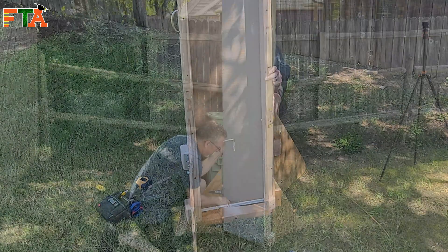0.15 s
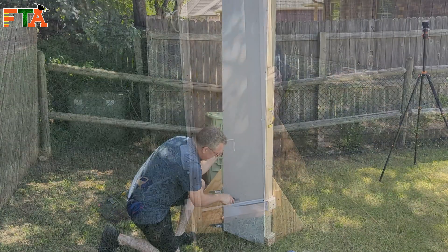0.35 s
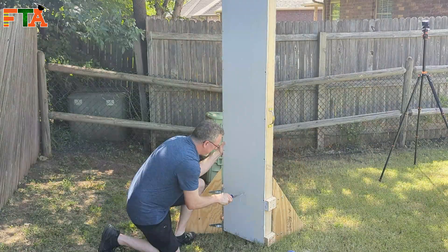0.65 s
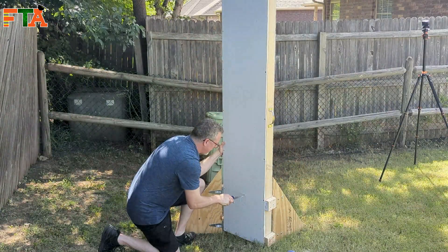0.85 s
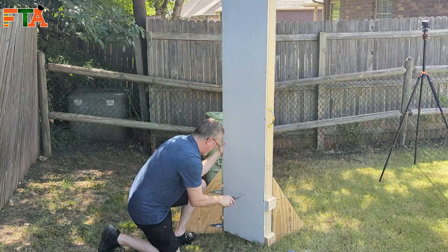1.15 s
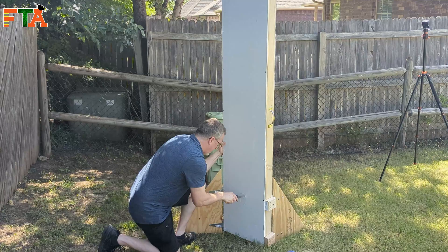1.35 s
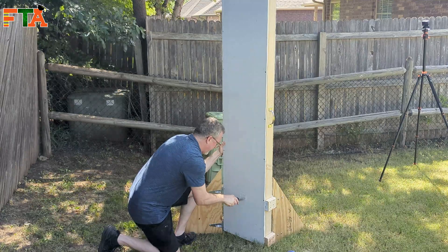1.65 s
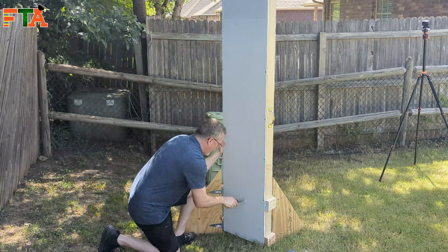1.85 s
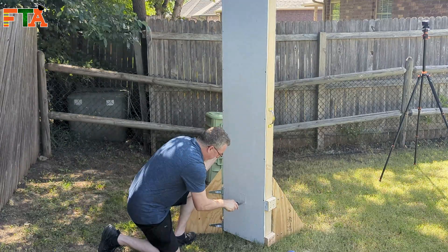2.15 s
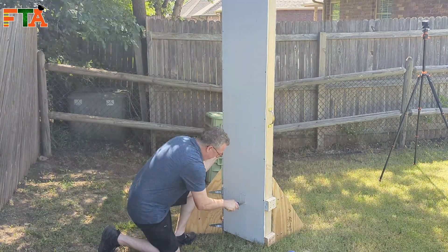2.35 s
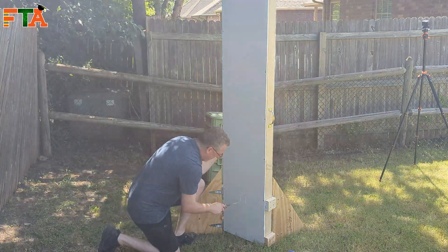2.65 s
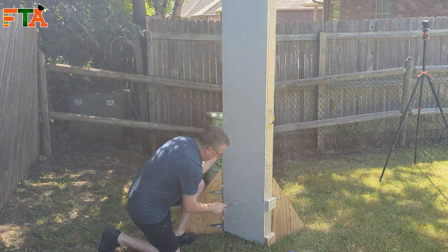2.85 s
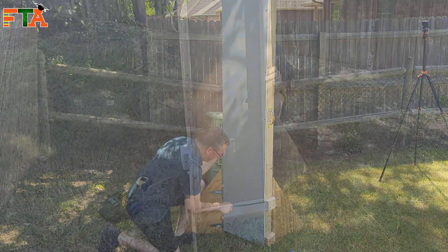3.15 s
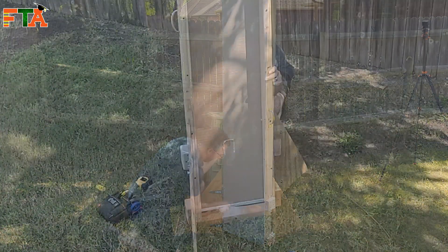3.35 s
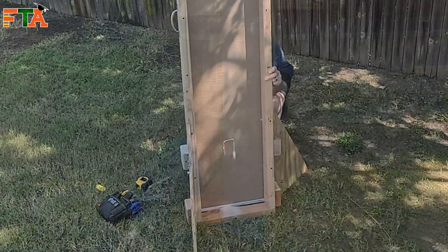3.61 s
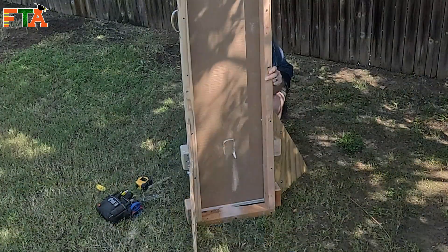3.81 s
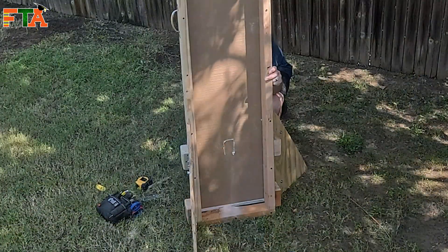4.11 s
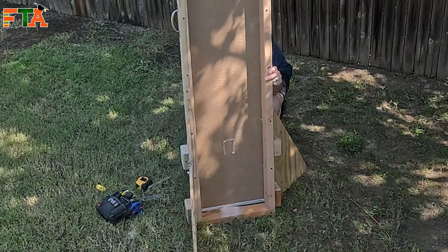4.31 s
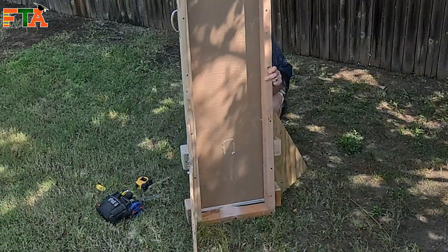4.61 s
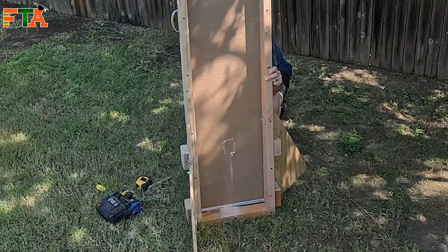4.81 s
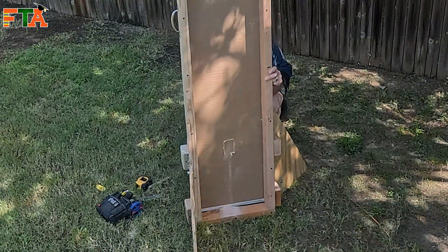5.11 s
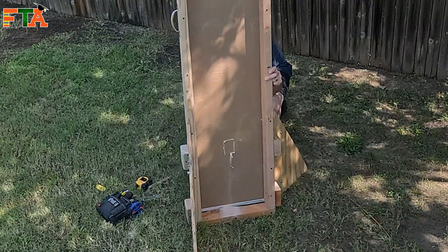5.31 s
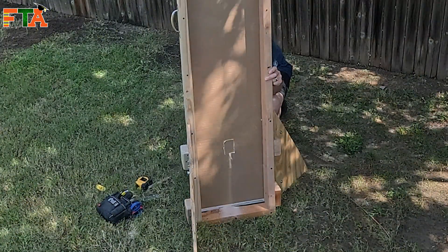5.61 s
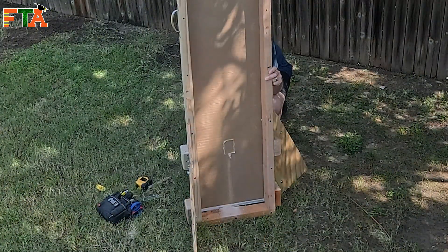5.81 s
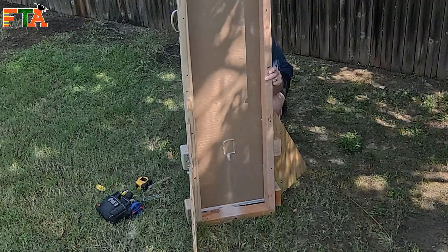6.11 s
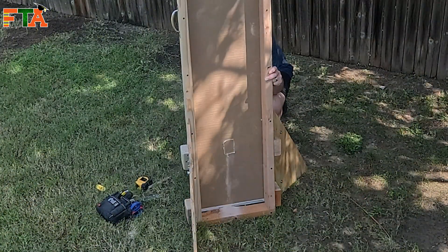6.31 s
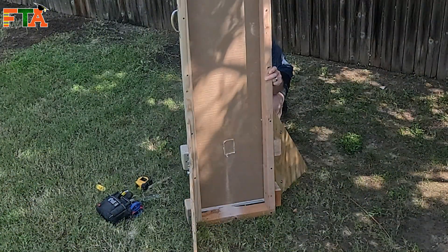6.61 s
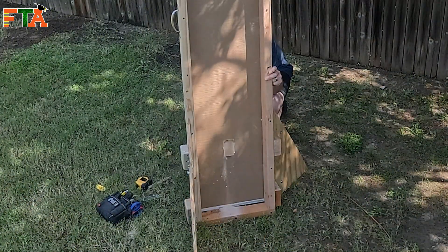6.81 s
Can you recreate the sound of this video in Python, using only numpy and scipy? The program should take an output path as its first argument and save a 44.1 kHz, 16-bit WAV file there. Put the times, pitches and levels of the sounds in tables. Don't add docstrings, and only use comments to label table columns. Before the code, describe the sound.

Quiet yard air and faint leaves open the scene. Light touches at 0.25 s lead to a burst of quick, bright, sped-up saw jabs from 0.37 to 0.68 s. A near-silent pause carries a very faint hum until 1.2 s. Then accelerated sawing bursts in unevenly, settling from 1.43 to 2.2 s into a rapid even chatter, about 28 strokes a second, with a hard knock near 2 s, and breaking up by 2.57 s. Quiet follows, with a tiny tap at 2.78 s and paper ticks from 3.05 to 3.3 s. From 3.62 s the sawing is at natural speed, deeper and hollow: a strong first stroke, weaker rubs, then steady strokes three or four a second, with panel thuds, gritty hiss, dragging and irregular cracks. Piercing five-kilohertz squeaks come at 5.25 and 5.32 s, a fainter one at 5.62 s. Sawing continues to the end near 7 s.

```python
import sys
import numpy as np
from scipy import signal
from scipy.fft import rfft, irfft, next_fast_len
from scipy.io import wavfile
from scipy.ndimage import uniform_filter1d, map_coordinates

SR = 44100
rng = np.random.default_rng(int(sys.argv[2]) if len(sys.argv) > 2 else 0)


def int16_out(signal):
    q = np.round(np.clip(np.atleast_2d(signal).T, -1, 1) * 32767)
    wavfile.write(sys.argv[1], SR, q.astype(np.int16))


def nominal_scale(level):
    x = np.asarray(level, float) / 20
    return 10 ** x


N = 306936
LAPSE = 4
STEADY_S = 0.038


def unit(x):
    return x / np.sqrt(np.mean(x ** 2) + 1e-20)


def along(points, hz):
    f, v = np.transpose(points)
    return np.interp(np.log(hz + 1), np.log(f + 1), v)


def curve(rows, column=1):
    rows = np.array(rows)
    t = np.arange(N) / SR
    return nominal_scale(np.interp(t, rows[:, 0], rows[:, column], left=-200, right=-200))


def wobble(rate):
    knots = rng.standard_normal(int(N * rate / SR) + 4)
    return map_coordinates(knots, [np.arange(N) * rate / SR])


def filtered(x, response):
    m = next_fast_len(N + SR // 2)
    return irfft(rfft(x, m) * response(np.fft.rfftfreq(m, 1 / SR)), m)[:N]


def noise(spectrum):
    return unit(filtered(rng.standard_normal(N), lambda hz: nominal_scale(along(spectrum, hz))))


def soften(x, hz):
    return signal.lfilter(*signal.butter(2, min(hz, 20000) / (SR / 2)), x)


def modes(table, speed=1):
    def response(f):
        total = 0
        for k, (hz, width, db) in enumerate(table):
            loss = 1j * f * width * speed
            total = total + (-1) ** k * nominal_scale(db) * loss / ((hz * speed) ** 2 - f * f + loss)
        return total
    return response


def driven(force, level, response):
    return filtered(force * level, response) / np.std(filtered(force, response))


def strokes(rows, values, crest, blunt, lead, trail, fade=1):
    out = np.zeros(N + SR)
    for (s, length, *_), v in zip(rows, values):
        u = np.linspace(0, 1, int(length * (1 + lead + trail) * SR))
        arch = np.sin(np.pi / 2 * np.where(u < crest, u / crest, (1 - u) / (1 - crest)))
        part = out[round((s - lead * length) * SR):][:len(u)]
        part[:] = np.maximum(part, v * arch ** np.where(u < crest, blunt, blunt * fade))
    return out[:N]


def teeth(rate, jitter, scatter_db):
    passed = np.floor(np.cumsum(rate * (1 + jitter * wobble(300))) / SR)
    hits = np.diff(passed, prepend=0) > 0
    sizes = nominal_scale(scatter_db * np.clip(rng.standard_normal(N), -2, 1.5))
    return unit(hits * sizes / np.sqrt(rate))


def cracks(events, t60):
    out, t = np.zeros(N + SR), np.arange(SR // 25) / SR
    fall = nominal_scale(-60 * t / t60)
    for s, db in events:
        burst = fall * rng.standard_normal(len(t))
        out[round(s * SR):][:len(t)] += nominal_scale(db) * burst * np.linalg.norm(fall) / np.linalg.norm(burst)
    return out[:N]


# start_s, level_db
YARD_AIR = [
    [(0, -57), (.225, -64.5)],
    [(.23, -68.5), (.7, -67.5), (.9, -69.5), (2.6, -67.5), (2.9, -67.5), (3.33, -69), (3.4, -70),
     (3.46, -80)],
    [(3.34, -67), (3.62, -63)],
]
# start_s, level_db
LEAF_RUSTLE = [
    [(0, -69), (.06, -64.5), (.13, -68.5), (.17, -65), (.225, -70)],
    [(3.34, -78), (3.37, -69), (3.4, -73.5), (3.7, -71), (4.2, -73.5), (5.1, -83), (5.22, -78), (5.3, -69),
     (6.96, -87)],
]
# pitch_hz, level_db (per Hz)
AIR_BACK_SPECTRUM = [(30, -18), (58, -4.5), (177, -1), (382, -14.5), (510, -10.5), (800, -17), (1300, -30),
                     (2600, -33), (5000, -74)]
LEAF_SPECTRUM = [(1180, -45), (2000, -17), (2690, -11), (3300, -11), (3800, -4), (6300, -5), (11600, -22.5),
                 (13500, -47)]
AIR_FRONT_SPECTRUM = [(60, -61), (115, -27), (155, -23), (330, -13), (404, -11), (570, -11), (1100, -21.5),
                      (1600, -28), (3000, -29.5), (5000, -39), (16000, -49)]
# start_s, end_s, pitch_hz, level_db
FAR_HUM = [(0.668, 1.2, 389.5, -74.5)]
# start_s, pitch_hz, level_db, t60_s
HANDLE_TAP = (2.778, 720, -49, .04)


def yard():
    t = np.arange(N) / SR
    back = (curve(YARD_AIR[0]) + curve(YARD_AIR[2])) * nominal_scale(4.3 * wobble(24.95)) * noise(AIR_BACK_SPECTRUM)
    leaves = (curve(LEAF_RUSTLE[0]) + curve(LEAF_RUSTLE[1])) * nominal_scale(1.6 * wobble(33)) * noise(LEAF_SPECTRUM)
    front = curve(YARD_AIR[1]) * nominal_scale(1.0 * wobble(23.0)) * noise(AIR_FRONT_SPECTRUM)
    hum = sum(nominal_scale(db + 3.0) * ((t > a) & (t < b)) * np.sin(2 * np.pi * hz * t) for a, b, hz, db in FAR_HUM)
    s, hz, db, t60 = HANDLE_TAP
    age = np.maximum(t - s, 0)
    tap = nominal_scale(db - 60 * age / t60) * np.tanh(age * hz) * np.sin(2 * np.pi * hz * age)
    mic_floor = nominal_scale(-100) * noise([(20, 5), (60, -1), (110, -32)])
    return mic_floor + back + leaves + front + hum + tap


def fences(x):
    t = np.arange(SR // 5) / SR
    tail = soften(rng.standard_normal(len(t)) * nominal_scale(-60 * t / 0.12) * (t > .005), hz=5000)
    return signal.fftconvolve(x, tail / np.linalg.norm(tail))[:N]


# pitch_hz, width_hz, level_db
PANEL_MODES = [(60.8, 8.5, -3), (83.5, 24.2, 1), (157.7, 21.5, 2.5), (214.2, 28.4, 1), (302.5, 15, -0.5),
               (394, 117, -8), (496.5, 28.4, 0), (556.5, 33.6, -3.5), (743, 96, -10), (918, 98, -12.5)]


def panel_body(speed=1, first=0):
    return modes(PANEL_MODES[first:], speed)


# pitch_hz, width_hz, level_db
FRAME_MODES = [(1308, 84, 0.5), (1702, 84, -2.5), (2202, 166, 0), (3130, 330, -3.5), (3720, 230, -5),
               (4300, 310, -2), (5050, 770, -12), (6650, 1000, -10), (8100, 560, -16)]


def frame_body(speed=1, count=None):
    return modes(FRAME_MODES[:count], speed)


# start_s, level_db
RESTLESS = [
    [(0.36, -76), (0.518, -55.5), (0.68, -64.5), (0.76, -87)],
    [(1.2, -62), (1.678, -59), (2.57, -61), (2.66, -104)],
]


def restless():
    return curve(RESTLESS[0]) + curve(RESTLESS[1])


# start_s, length_s, level_db (panel)
SEARCHING = [(0.367, 0.035, -46.5), (0.404, 0.035, -52.5), (0.464, 0.034, -42), (0.493, 0.028, -41),
             (0.522, 0.034, -44), (0.548, 0.038, -44), (0.576, 0.045, -42), (0.64, 0.033, -49.5),
             (1.21, 0.014, -55), (1.235, 0.031, -40.5), (1.237, 0.066, -34.5), (1.312, 0.061, -40),
             (1.36, 0.027, -45.5), (1.385, 0.066, -42), (2.172, 0.064, -45), (2.232, 0.047, -53.5),
             (2.281, 0.04, -45.5), (2.306, 0.04, -42.5), (2.371, 0.034, -50), (2.408, 0.049, -54),
             (2.446, 0.034, -46.5), (2.475, 0.029, -48), (2.52, 0.042, -51)]
# start_s, level_db (peak)
EVEN_CATCHES = [(1.437, -31.5), (1.4715, -35.5), (1.5038, -30.5), (1.5406, -34), (1.574, -31),
                (1.611, -29.5), (1.641, -28), (1.6804, -38), (1.711, -30.5), (1.7464, -38), (1.781, -31.5),
                (1.8162, -33.5), (1.8522, -30.5), (1.8874, -35.5), (1.9215, -33.5), (1.956, -44),
                (1.9952, -33), (2.027, -47), (2.0602, -30), (2.0996, -33.5), (2.1355, -33.5),
                (2.169, -35.5)]
EVEN_DB = [-34.5, -38, -39, -36.5, -37.5, -36.5, -33.5, -40.5, -34.5, -40, -35.5, -35.5, -36, -37.5, -38.5,
           -44.5, -40.5, -43, -37.5, -36, -37.5, -39]
# start_s, end_s, level_db (panel)
SET_DOWNS = [
    (0.224, 0.315, -65),
    (0.982, 1.172, -67),
    (3.038, 3.2, -70),
    (3.193, 3.341, -65),
]


def quick_strokes(count=6):
    push_lead_s = 0.015
    steady = [(s - push_lead_s, STEADY_S, db) for (s, _), db in zip(EVEN_CATCHES, EVEN_DB)]
    touches = []
    for a, b, db in SET_DOWNS:
        step = (b - a) / count
        for k, luck in enumerate(rng.standard_normal(count)):
            touches.append((a + step * k, 1.02 * step, db + 1.5 * luck))
    return np.array(SEARCHING + steady + touches)


def quick_catches(rows):
    loose = rows[~np.isclose(rows[:, 1], STEADY_S)]
    catch = strokes(loose, nominal_scale(1.056 * loose[:, 2] - 12), 0.44, blunt=3.2, lead=0.04, trail=0.059)
    even = [(s - 0.0072, 0.028) for s, _ in EVEN_CATCHES]
    rms = [nominal_scale(db - 17.5) for _, db in EVEN_CATCHES]
    catch += strokes(even, rms, 0.2, blunt=1.47, lead=0, trail=0.25)
    return catch + nominal_scale(-17) * restless()


# start_s, level_db
PAPER_SLIDES = [
    [(.98, -82), (1.0, -73.5), (1.19, -79)],
    [(3.0, -83), (3.06, -80), (3.18, -73), (3.21, -75), (3.33, -82)],
]
# pitch_hz, width_hz, level_db
PAPER_MODES = [(2000, 150, 10.5), (3600, 970, -5)]
# start_s, level_db (peak)
PAPER_TICKS = [(3.0494, -68), (3.0644, -62), (3.0769, -62), (3.0914, -65), (3.1074, -63), (3.1499, -61),
               (3.1774, -58), (3.2014, -66), (3.2146, -58), (3.2265, -58), (3.2516, -64), (3.2744, -57.5),
               (3.304, -55), (3.3172, -62)]


def quick_dust(catch, bites, studs):
    dust = catch * nominal_scale(-2.0) * (bites + 1.71) * noise([(1500, -30.5), (3000, 2.0), (8000, -16.5), (16000, -9.5)])
    paper = modes(PAPER_MODES)
    slide = (curve(PAPER_SLIDES[0]) + curve(PAPER_SLIDES[1])) * nominal_scale(4.9 * wobble(45))
    dust += driven(rng.standard_normal(N), slide, paper)
    ticks = cracks(np.add(PAPER_TICKS, [0, 4.5]), t60=0.016)
    return dust + filtered(ticks, lambda f: studs(f) + nominal_scale(4) * paper(f))


# start_s, level_db (peak)
BITES_IN = [(0.370, -26.5), (0.409, -27), (0.459, -29), (0.252, -50), (0.287, -41), (0.307, -44),
            (1.133, -38.5), (1.209, -25.5), (1.231, -23), (1.258, -21.5), (1.326, -25), (1.431, -23),
            (1.535, -22), (1.676, -27), (1.708, -27), (1.779, -28), (1.849, -19), (1.882, -19),
            (1.988, -12), (2.423, -27), (3.305, -49)]


def quick_jabs(board, studs):
    jabs = cracks(BITES_IN, t60=0.035)
    bodies = filtered(nominal_scale(0.5) * jabs, board) + filtered(nominal_scale(-14.5) * jabs, studs)
    return bodies + nominal_scale(-39) * soften(jabs, hz=5000)


# pitch_hz, level_db
FRONT_COLOUR = [(250, 3), (500, 0), (900, -1.5), (1900, 0), (2250, -5.5), (2800, -4.5), (4000, -8.5),
                (5000, -5), (9000, -5), (12000, -4), (16000, -24)]


def saw_front():
    tint = lambda body: lambda f: body(f) * nominal_scale(along(FRONT_COLOUR, f))
    board, studs = tint(panel_body(LAPSE)), tint(frame_body(LAPSE, count=6))
    rows = quick_strokes()
    push = strokes(rows, nominal_scale(rows[:, 2] + 1.5), 0.37, blunt=1.16, lead=0.012, trail=0.053)
    push *= nominal_scale(2.2 * wobble(150))
    drumming = teeth(np.full(N, 170. * LAPSE), jitter=.5, scatter_db=5.0)
    bite = soften(drumming + .5 * rng.standard_normal(N), hz=4450)
    panel = driven(bite, push + restless(), board)
    catch = quick_catches(rows)
    chipping = teeth(np.full(N, 72. * LAPSE), jitter=.25, scatter_db=4)
    bites = unit(signal.lfilter([1], [1, -.95], chipping))
    frame = driven((bites + .35) * rng.standard_normal(N), catch, studs)
    return panel + frame + quick_dust(catch, bites, studs) + quick_jabs(board, studs)


# pitch_hz, level_db (per Hz)
ROCKING = [(20, 8), (40, -6.5), (55, -29), (80, 3), (130, 10), (190, -10), (300, 0)]


def rocking_frame(front):
    power = np.abs(uniform_filter1d(front ** 2, size=2000))
    return nominal_scale(-47.5) * power ** (0.57 / 2) * noise(ROCKING)


# start_s, length_s, start_hz, end_hz, level_db
BLADE_SQUEAKS = [(5.2486, 0.003, 5286, 5240, -26), (5.250, 0.0073, 5103, 5050, -12.5),
                 (5.282, 0.0093, 5050, 4800, -42), (5.296, 0.013, 5160, 5200, -36),
                 (5.323, 0.01, 5283, 4797, -14), (5.624, 0.0063, 5050, 5000, -31),
                 (3.328, .02, 10900, 11300, -70), (3.328, .018, 8900, 8700, -76),
                 (3.345, 0.044, 2730, 2620, -71), (3.348, .05, 4680, 4800, -72),
                 (3.5, .09, 2640, 2840, -76), (3.5, .11, 4900, 4750, -78)]
# delay_s, level_db
FENCE_ECHOES = [(.006, -30), (.010, -34), (.014, -34), (.025, -32), (.034, -44)]
# multiple, level_db
SQUEAK_OVERTONES = [(2, -28.5), (3, -45)]


def squeaks():
    out = np.zeros(N)
    for s, length, from_hz, to_hz, db in BLADE_SQUEAKS:
        u = np.linspace(0, 1, int(length * SR))
        phase = 2 * np.pi * np.cumsum(from_hz + (to_hz - from_hz) * u) / SR
        tone = np.sin(phase) + sum(nominal_scale(level) * np.sin(k * phase) for k, level in SQUEAK_OVERTONES)
        out[round(s * SR):][:len(u)] += nominal_scale(db) * np.sin(np.pi * u) ** 2 * tone
    return out + sum(nominal_scale(db) * np.roll(out, round(s * SR)) for s, db in FENCE_ECHOES)


# start_s, level_db (peak)
FIRST_SNAGS = [(3.6177, -33), (3.6311, -46), (3.6384, -36), (3.6524, -40), (3.7064, -42), (3.7174, -34),
               (3.7299, -20), (3.7534, -27.5), (3.9419, -46), (3.9774, -61), (3.9968, -50), (4.0602, -39),
               (4.0711, -39), (4.0834, -37), (4.1434, -64), (4.2682, -50), (4.2822, -45), (4.355, -48),
               (4.4044, -46), (4.4244, -44), (4.4662, -32), (4.4787, -28), (4.4914, -31.5), (4.5047, -31),
               (4.5416, -44), (4.57, -41), (4.5999, -32.5), (4.6598, -46), (4.6733, -46), (4.6897, -36),
               (4.7122, -23), (4.7274, -28), (4.7441, -24.5), (4.7544, -27), (4.7774, -32.5), (4.7894, -41),
               (4.8244, -40), (4.8424, -35), (4.8683, -27), (4.9232, -44), (4.9347, -37), (4.9816, -34.5),
               (5.0025, -30.5), (5.0194, -28.5), (5.0324, -29), (5.0569, -31.5), (5.1073, -56),
               (5.1342, -46), (5.2064, -48)]
# start_s, level_db (peak)
DEEP_SNAGS = [(5.2974, -36.5), (5.3114, -35.5), (5.3393, -38), (5.3722, -46), (5.4349, -33),
              (5.4614, -36.5), (5.4944, -40), (5.5069, -37), (5.5433, -41), (5.5653, -29), (5.5764, -28.5),
              (5.6296, -30.5), (5.6451, -33), (5.6574, -33.5), (5.692, -42), (5.7194, -32), (5.7498, -38),
              (5.7778, -34), (5.8117, -45), (5.8262, -45), (5.8449, -34), (5.8611, -23), (5.904, -24),
              (5.9768, -42), (6.0023, -32), (6.0152, -31.5), (6.0432, -35), (6.128, -38), (6.1365, -32),
              (6.2133, -24), (6.2711, -37), (6.2971, -34), (6.3114, -38), (6.3265, -33.5), (6.3684, -38.5),
              (6.4004, -43), (6.4333, -34), (6.4462, -35), (6.4707, -28.5), (6.4991, -28), (6.5114, -29),
              (6.5554, -43), (6.571, -49), (6.6054, -58), (6.6458, -45), (6.6937, -43), (6.7231, -32),
              (6.7321, -29.5), (6.7469, -23.5), (6.759, -19), (6.7704, -23), (6.8369, -41), (6.8498, -30.5),
              (6.8643, -27.5)]


def snags():
    crack = cracks(np.r_[FIRST_SNAGS, DEEP_SNAGS] + [0, 9], t60=0.022)
    frame, bare = frame_body(), modes([(3620, 2600, -17.0)])
    sharp = soften(filtered(crack, lambda f: frame(f) + bare(f)), hz=6470)
    return sharp + filtered(nominal_scale(14.0) * soften(crack, hz=1530), panel_body())


# pitch_hz, width_hz, level_db
BLADE_MODES = [(3760, 88, 2), (4170, 170, -21), (5000, 600, 18.5), (5870, 420, 14.5), (6400, 140, 1),
               (7250, 170, 1.5), (8100, 110, 4), (9740, 240, -7.5)]


def steel():
    scrape = rng.standard_normal(N) * nominal_scale(2.5 * wobble(250))
    swells_db = [3 * wobble(12) for _ in BLADE_MODES]
    deeper = np.tanh((np.arange(N) / SR - 5.95) / .1)
    swells_db[-2] = swells_db[-2] + 4 * deeper
    swells_db[-1] = swells_db[-1] - 4 * deeper
    total = np.zeros(N)
    for (hz, width, db), swell in zip(BLADE_MODES, swells_db):
        ring = unit(signal.lfilter(*signal.iirpeak(hz, hz / width, SR), scrape))
        total += nominal_scale(db + swell) * ring
    return unit(soften(total, hz=12000))


# start_s, level_db (panel), level_db (frame)
KERF_DRAG = [
    (3.62, -52.5, -73),
    (4.2, -59.5, -77.5),
    (4.5, -47, -73),
    (5.2, -47, -71.5),
    (5.228, -75, -83),
    (5.255, -55.5, -83),
    (5.275, -46, -81),
    (6.96, -47, -101),
]


def dragging_blade():
    slips = teeth(np.full(N, 90.), jitter=1.5, scatter_db=5.5)
    slips = soften(slips + 0.27 * rng.standard_normal(N), hz=1030)
    panel = driven(slips, curve(KERF_DRAG), panel_body())
    return panel + driven(rng.standard_normal(N), curve(KERF_DRAG, column=2), frame_body(count=5))


# start_s, length_s, level_db (panel), level_db (grit), rate_hz (teeth)
SAW_STROKES = [(3.618, 0.11, -27.5, -46.5, 216), (3.934, 0.14, -41, -61, 206),
               (4.24, .095, -48, -66.5, 189), (4.396, 0.11, -38.5, -56.5, 203),
               (4.534, .095, -40, -60.5, 197), (4.672, 0.1, -33.5, -53, 192),
               (4.819, 0.096, -39, -63.5, 150), (4.978, 0.064, -34.5, -52, 188),
               (5.092, 0.11, -53, -63.5, 190), (5.272, 0.061, -51, -63, 170),
               (5.388, 0.12, -41.5, -59.5, 146), (5.54, 0.11, -31.5, -50.5, 160),
               (5.672, 0.11, -40.5, -60.5, 195), (5.823, 0.087, -33, -52, 232),
               (5.952, .113, -38.5, -60, 159), (6.115, .11, -29.5, -50, 165),
               (6.247, 0.12, -36.5, -58.5, 150), (6.421, 0.083, -32, -54, 244),
               (6.536, 0.12, -42.5, -62, 213), (6.689, .088, -32.5, -50.5, 173),
               (6.813, 0.088, -40, -58.5, 206), (6.939, 0.056, -52, -68, 217)]
# start_s, level_db (peak)
HOLD_THUDS = [(3.631, -20), (3.962, -32), (4.282, -36), (4.401, -36), (4.564, -25), (4.677, -21.5),
              (4.842, -28), (4.982, -18), (5.132, -30.5), (5.273, -40), (5.407, -29), (5.544, -25),
              (5.702, -23.5), (5.827, -33), (5.994, -21), (6.121, -21), (6.266, -29), (6.424, -18),
              (6.564, -27.5), (6.692, -19.5), (6.833, -24), (6.944, -38)]


def panel_strokes():
    rasp = np.array(SAW_STROKES)
    rows = rasp * [1, 1.25, 1, 1, 1]
    rows[:, 0] = np.array(HOLD_THUDS)[:, 0]
    rows[:, 1] -= rows[:, 0] - rasp[:, 0]
    rate = 100 + strokes(rows, rows[:, 4] - 100, .25, blunt=.12, lead=.1, trail=.25)
    return rows, rate


# start_s, level_db (peak)
BLADE_JOLTS = [(3.68, -20), (3.983, -34), (3.999, -26), (4.574, -39), (4.875, -28.5), (5.044, -27.5),
               (5.312, -34), (5.576, -14), (5.859, -21.5), (5.871, -23), (6.029, -32), (6.271, -30),
               (6.444, -18), (6.479, -35)]


def panel_blows():
    upper = panel_body(first=2)
    thuds = soften(cracks(np.add(HOLD_THUDS, [0, 22]), t60=0.01), hz=550)
    jolts = soften(cracks(np.add(BLADE_JOLTS, [0, 25.5]), t60=0.013), hz=350)
    return filtered(thuds, upper) + filtered(jolts, upper)


# pitch_hz, level_db (per Hz)
WALL_SHAKE = [(25, -27), (45, -11.5), (60, 7), (85, 8), (120, -35)]


def drummed_panel(rows, rate):
    bite = teeth(rate, jitter=.3, scatter_db=3.5) - .05
    bite = soften(bite + .7 * rng.standard_normal(N), hz=1500)
    push = strokes(rows, nominal_scale(rows[:, 2]), .25, blunt=0.2, lead=0.035, trail=0.25, fade=5.8)
    body = panel_body()
    panel = driven(bite, push * nominal_scale(1.63 * wobble(40)), body)
    turn = 2 * np.pi * np.cumsum(rate * (1 + 0.043 * wobble(30))) / SR
    orders = [(1, 1), (2, -2.5), (3, 1)]
    hum = sum(nominal_scale(db) * np.abs(body(k * rate)) * np.sin(k * turn) for k, db in orders)
    panel += nominal_scale(-2) * push ** 2 / push.max() * hum
    return panel + nominal_scale(-24) * (push + curve(KERF_DRAG)) * noise(WALL_SHAKE)


# pitch_hz, level_db (per Hz)
GRIT_SPECTRUM = [(590, -33), (1000, -3.5), (1870, -1.5), (2140, -5.5), (2580, -3.5), (5100, -15),
                 (7200, -21), (9960, -21), (10800, -45), (15800, -60)]
# start_s, length_s, level_db (grit)
TURN_SCUFFS = [(4.086, 0.031, -66), (4.349, 0.026, -69), (4.653, .02, -65), (4.945, 0.033, -61),
               (5.515, 0.024, -63), (5.804, .016, -63), (6.088, .026, -62), (6.39, .026, -61),
               (6.66, .024, -64)]


def crumbling_grit(rate):
    scuffs = np.r_[np.array(SAW_STROKES)[:, [0, 1, 3]], TURN_SCUFFS]
    grit = strokes(scuffs, nominal_scale(scuffs[:, 2] + 9), 0.46, blunt=0.42, lead=0.0071, trail=0.026, fade=1.9)
    grit *= nominal_scale(1.8 * wobble(60))
    chips = signal.lfilter([1], [1, -.988], teeth(rate * .5, jitter=1.2, scatter_db=4))
    bind = np.pad(grit, (round(0.033 * SR), 0))[:N]
    chatter = driven(soften(chips * rng.standard_normal(N), hz=4200), bind * nominal_scale(-9), frame_body())
    hiss = grit * nominal_scale(2.2 * wobble(400) - 7.0) * noise(GRIT_SPECTRUM)
    finest = noise([(6000, -36), (8500, 0), (10000, -2.5), (10800, -9.5), (13200, -11), (15800, -12)])
    hiss += grit * nominal_scale(-16 + 3.5 * wobble(300)) * finest
    ringing = (grit * nominal_scale(-1.0) + nominal_scale(-11.0) * curve(KERF_DRAG, column=2)) * steel()
    return chatter + hiss + ringing


def saw_behind():
    rows, rate = panel_strokes()
    return drummed_panel(rows, rate) + panel_blows() + crumbling_grit(rate) + dragging_blade()


def scene():
    behind = saw_behind() + soften(snags(), hz=11650)
    front = signal.lfilter(*signal.butter(2, 190 / (SR / 2), "high"), saw_front())
    front += rocking_frame(front)
    return (behind + nominal_scale(-14.0) * fences(behind) + front + squeaks() + yard())[None]


def top_cut(x):
    return signal.sosfilt(signal.butter(12, 16470, fs=SR, output="sos"), x)


def record(dry):
    top_hz, low_hz, gate_hz, gate_db, gate_s = 15850, 36, 12900, -92, 0.018
    sound = filtered(dry[0], lambda hz: (hz < top_hz) * (1 - 0.8 / (1 + (hz / low_hz) ** 8)))
    top = filtered(sound, lambda hz: hz > gate_hz)
    power = np.abs(uniform_filter1d(top ** 2, size=round(gate_s * SR)))
    shut = 1 / (1 + (power / nominal_scale(2 * gate_db)) ** 4)
    mix = (sound - shut * top)[None]
    return top_cut(mix)


dry = scene()
out = record(dry)
int16_out(out)
```